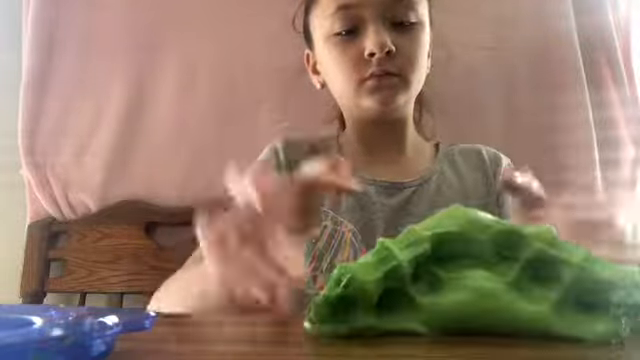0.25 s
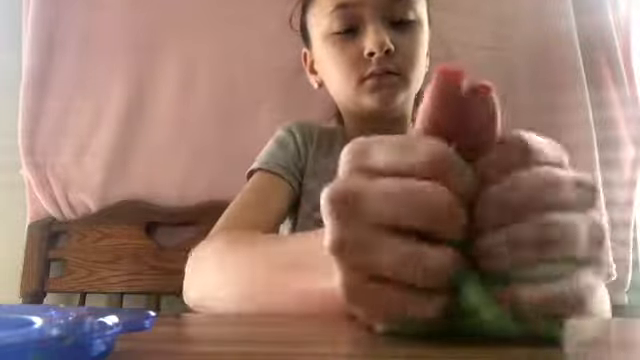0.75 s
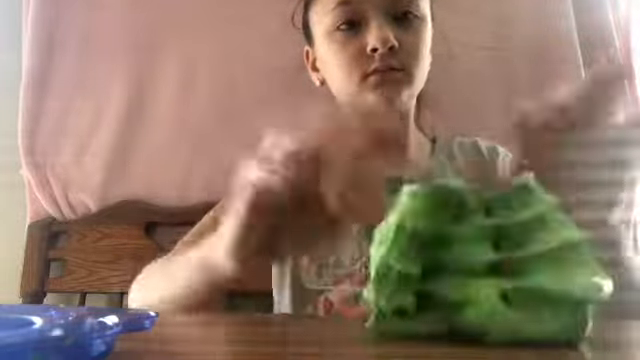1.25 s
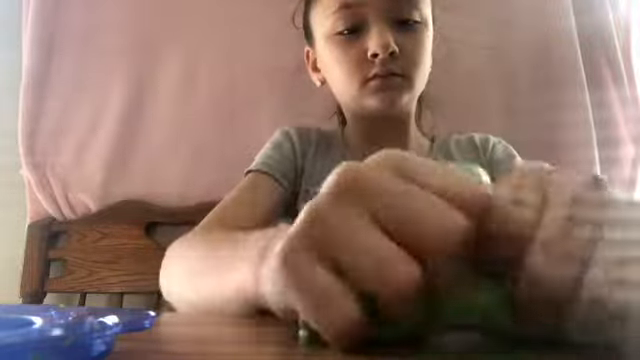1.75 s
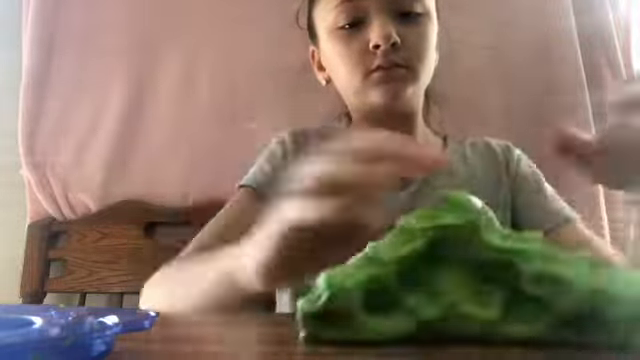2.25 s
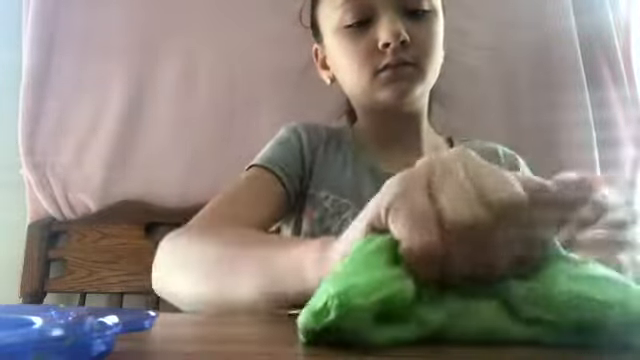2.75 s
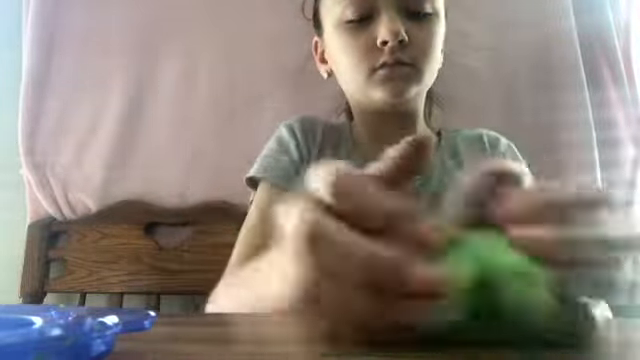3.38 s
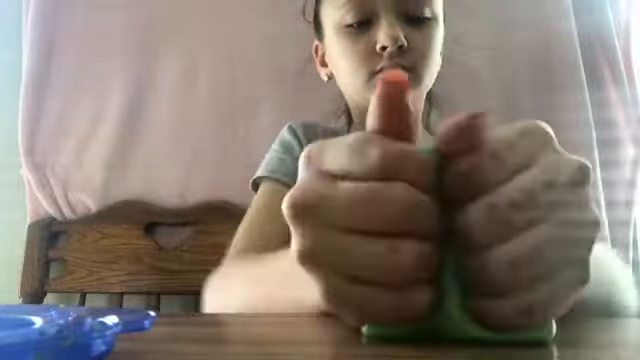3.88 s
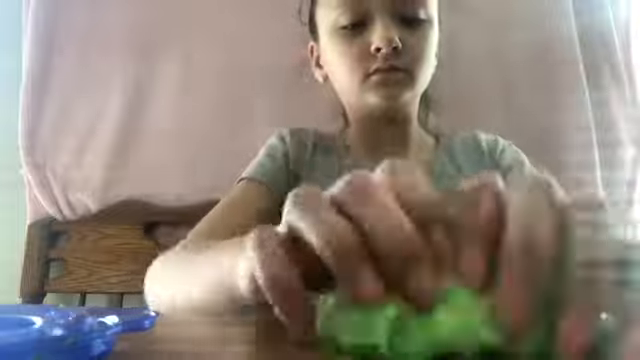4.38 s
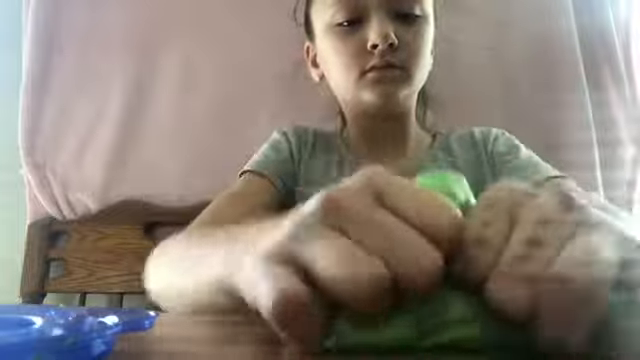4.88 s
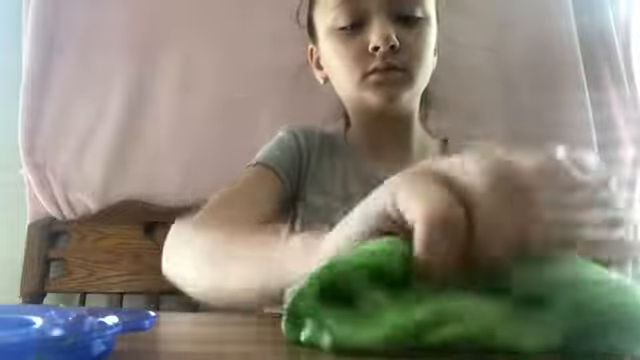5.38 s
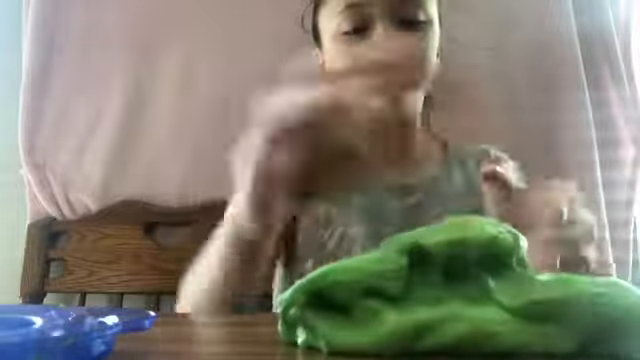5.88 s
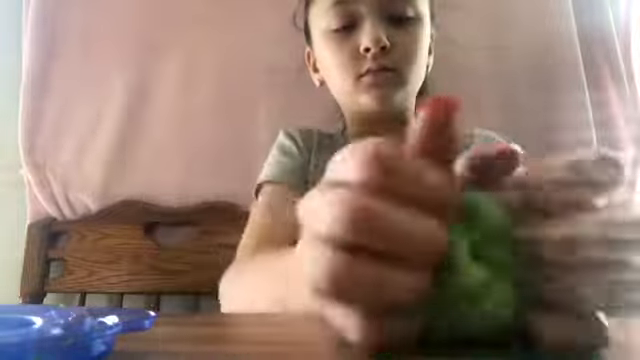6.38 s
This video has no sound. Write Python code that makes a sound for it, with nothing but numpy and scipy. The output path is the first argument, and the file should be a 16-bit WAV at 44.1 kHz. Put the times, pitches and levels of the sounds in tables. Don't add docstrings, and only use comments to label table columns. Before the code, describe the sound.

A small microphone sits close to hands kneading sticky slime on a wooden table in a quiet bedroom. A wet peel and small pops open the sound, then a softer moment. From 0.65 to 0.95 seconds a hollow plop and a spitting cluster burst out, strongest near 0.87. Fingers peel with a crackle at 1.1; knocks and scattered pops run from 1.45 to 2.25, ending in a round gulp. It thins until about 3.3, with faint ticks and a sticky peel near 3.0. Bright snaps crowd 3.45 to 3.75, peaking at 3.7. Dense popping and squelching fills 4.45 to 4.85, with a very loud crack at 4.79. Another peel comes at 5.0, a barely audible skin squeak at 5.3, and a big hollow pop at 5.63. Thumps and peels lead to a final sharp cluster at 6.5 to 6.6. Low hum continues throughout; a faint whine fades around 2.

```python
import sys
import numpy as np
from scipy import signal
from scipy.fft import rfft, irfft, next_fast_len
from scipy.io import wavfile
from scipy.ndimage import uniform_filter1d, map_coordinates

SR = 44100
rng = np.random.default_rng(int(sys.argv[2]) if len(sys.argv) > 2 else 0)


def nominal_scale(level):
    x = np.asarray(level, float) / 20
    return 10 ** x


def file_out(sig):
    cols = np.atleast_2d(sig).T
    lim = np.clip(cols, -1, 1)
    pcm = np.round(lim * 32767).astype(np.int16)
    wavfile.write(sys.argv[1], SR, pcm)


N = 292383


def unit(x):
    return x / np.sqrt(np.mean(x ** 2) + 1e-20)


def along(points, hz):
    f, v = np.transpose(points)
    return np.interp(np.log(hz + 1), np.log(f + 1), v)


def curves(rows):
    s, *cols = np.transpose(rows)
    return [np.interp(np.arange(N) / SR, s, c) for c in cols]


def wobble(rate):
    knots = rng.standard_normal(int(N * rate / SR) + 4)
    return map_coordinates(knots, [np.arange(N) * rate / SR])


def filtered(x, response):
    m = next_fast_len(N + SR // 2)
    return irfft(rfft(x, m) * response(np.fft.rfftfreq(m, 1 / SR)), m)[..., :N]


def coloured(x, spectrum):
    return unit(filtered(x, lambda hz: nominal_scale(along(spectrum, hz))))


def decay(t, t60):
    return nominal_scale(-60 * t / t60)


def ring(t, hz, t60, rise):
    return np.sin(2 * np.pi * hz * t) * decay(t, t60) * (1 - np.exp(-t / rise))


def burst(x, db):
    return nominal_scale(db) * x * np.sqrt(SR / 1000 / np.sum(x ** 2))


def place(out, s, sound):
    out[round(s * SR):][:len(sound)] += sound


# (time [s], snap level [dB], snap pitch [Hz], hollow level [dB], hollow pitch [Hz])
DEEP_POCKETS = [(0.0706, -27.5, 4080, -35, 2320), (1.1965, -24.5, 5200, -31, 2300),
                (1.5732, -35, 3630, -29, 1200), (1.8264, -34, 5840, -32, 1650),
                (1.9004, -24, 4420, -33, 2480), (1.917, -49, 4149, -35.5, 1740),
                (2.0893, -30, 2800, -39.5, 1348), (2.2064, -25.5, 4940, -36.5, 1100),
                (2.2285, -24.5, 4100, -26.5, 1530), (3.351, -39.5, 6900, -32.5, 1490),
                (3.466, -29, 4680, -25, 1390), (3.5351, -28.5, 3120, -29, 1760),
                (4.0942, -34, 6200, -29.5, 1110), (4.458, -28.5, 6000, -24, 1470),
                (4.472, -27, 8200, -35, 1090), (4.653, -22, 6700, -33, 2600),
                (4.7337, -31.5, 7100, -33, 1330), (4.773, -32.5, 3500, -32, 800),
                (4.7854, -10, 6560, -21, 1690), (4.822, -28, 2550, -27.5, 1200),
                (4.8539, -25.5, 4600, -39.5, 1700), (5.6285, -16, 6100, -14.5, 1660),
                (6.2099, -34.5, 7560, -31.5, 1538), (6.502, -35.5, 4940, -35, 1970)]
# (time [s], snap level [dB], snap pitch [Hz], air level [dB])
THIN_POCKETS = [(.758, -33.5, 3742, -37.5), (0.8108, -36.5, 3980, -38), (0.839, -40, 7150, -46),
                (0.8729, -17.5, 4900, -17), (0.886, -35, 4650, -19.5), (0.889, -53, 7730, -34),
                (0.9218, -30.5, 2960, -44), (.925, -30, 6300, -40.5), (0.935, -24, 6650, -43),
                (1.1556, -34.5, 3600, -36), (1.6521, -32, 4500, -51), (1.72, -29, 4830, -31.5),
                (1.7686, -39, 6629, -32), (1.8783, -38, 6860, -36), (3.4505, -28, 3600, -40),
                (3.457, -38.5, 2690, -47), (3.6145, -17, 6430, -18), (3.6433, -20.5, 6600, -25),
                (3.7008, -10, 6700, -38), (3.72, -15.5, 6400, -25.5), (3.8126, -45, 8100, -36),
                (4.465, -55, 7280, -24.5), (4.665, -39, 7840, -34.5), (4.6988, -22.5, 6400, -50.5),
                (6.4403, -39, 4900, -34.5), (6.5242, -16, 3800, -15.5), (6.5324, -25.5, 6000, -24),
                (6.5782, -21.5, 5200, -40), (6.5833, -13, 4860, -26.5), (6.6172, -20.5, 6000, -45)]
# (time [s], snap level [dB], snap pitch [Hz])
SMALL_POCKETS = [(0.038, -30, 2760), (.56, -33, 6030), (0.578, -37, 6460), (0.7461, -37, 7156),
                 (1.459, -42.5, 8200), (1.6267, -39, 5100), (1.707, -37, 6208), (1.8104, -38.5, 5150),
                 (1.9113, -33.5, 9000), (2.6408, -46.5, 6660), (2.8063, -46, 6600), (3.3596, -38.5, 2640),
                 (3.4226, -33, 7140), (3.8193, -38.5, 7320), (3.8528, -32.5, 6007), (4.0065, -34, 4380),
                 (4.0177, -31, 7560), (4.0911, -33, 3900), (4.444, -35, 8000), (4.538, -32.5, 3600),
                 (4.5786, -35.5, 2630), (4.617, -33, 2520), (4.703, -29, 2370), (4.9343, -36, 4780),
                 (5.595, -37.5, 2580), (5.638, -38, 5490), (5.854, -30.5, 5000), (6.1052, -40, 6470),
                 (6.3417, -38.5, 6300), (6.449, -33.5, 6300)]
# (time [s], hollow level [dB], hollow pitch [Hz])
FINGER_PLOPS = [(0.057, -27, 2060), (0.6625, -27.5, 1107), (1.18, -25.5, 1400), (1.1844, -30, 646.5),
                (1.457, -43, 855), (1.685, -38, 1623), (1.8098, -36, 1740), (1.8148, -35.5, 2320),
                (2.098, -30, 1030), (2.115, -29.5, 1320), (2.8218, -33.5, 1500), (3.5829, -34, 1780),
                (3.6145, -28, 1730), (3.6225, -33.5, 1070), (4.0837, -32.5, 1860), (4.13, -42, 1680),
                (4.3508, -42, 807), (4.5278, -34.5, 1780), (4.783, -20, 1550), (5.5734, -36, 1660),
                (6.2024, -34.5, 1590), (6.524, -21, 1870)]


def pockets():
    shallow_db, shallow_hz = -25.5, 1500
    deep = [(s, db, hz, db - 17, low_db, low_hz) for s, db, hz, low_db, low_hz in DEEP_POCKETS]
    thin = [(s, db, hz, air_db, db + shallow_db, shallow_hz) for s, db, hz, air_db in THIN_POCKETS]
    small = [(s, db, hz, db - 17.5, db + shallow_db, shallow_hz) for s, db, hz in SMALL_POCKETS]
    plops = [(s, db - 22, 4500, db - 25, db, hz) for s, db, hz in FINGER_PLOPS]
    return deep + thin + small + plops


def pops():
    slap_s, slap_db, slap_hz = 0.0092, -29, 6000
    out, t = np.zeros(N + SR), np.arange(SR // 30) / SR
    hz = np.fft.rfftfreq(len(t), 1 / SR)
    late = np.maximum(t - slap_s, 0)
    for s, snap_db, snap_hz, air_db, hollow_db, hollow_hz in pockets():
        noise, luck = rng.standard_normal((2, len(t))), rng.random(3)
        snap = ring(t, snap_hz, 16 / snap_hz, .00006)
        snap = snap + 2.1 * ring(t, snap_hz * (.92 + .2 * luck[0]), 4.2 / snap_hz, .00003)
        air = ring(t, 9000 + 2500 * luck[1], 0.001, .00004)
        air = air - ring(t, 12200 + 3000 * luck[2], 0.0008, .00004)
        hollow = ring(t, hollow_hz, 7 / hollow_hz, .0001)
        flap = irfft(rfft(noise[0]) * hz / (1 + (hz / (1.1 * snap_hz)) ** 4), len(t))
        spray = flap * decay(t, 0.006) * (1 - np.exp(-t / 0.0011))
        slap = irfft(rfft(noise[1]) / (1 + ((hz - slap_hz) / 2000) ** 4), len(t))
        slap = slap * late * decay(late, .008)
        pop = burst(snap, snap_db) + burst(air, air_db)
        pop = pop + burst(hollow, hollow_db) + burst(spray, snap_db - 11)
        pop = .95 * (pop + .28 * np.roll(pop, rng.integers(7, 19)))
        place(out, s, pop + burst(slap, snap_db + slap_db))
    return filtered(out[:N], lambda hz: (1j * hz / (480 + 1j * hz)) ** 2)


# (time [s], level over 1 ms [dB], pitch [Hz])
BUBBLE_TICKS = [(0.4503, -45.5, 5700), (0.646, -43.5, 2600), (0.716, -34.5, 970), (0.7204, -40.5, 614),
                (0.9447, -41, 1530), (1.4776, -46, 10540), (1.5593, -60, 2300), (1.7854, -40, 10620),
                (1.8802, -45, 1756), (6.034, -54, 7000), (2.7428, -44, 1360), (3.693, -48.5, 4600),
                (2.918, -49, 7900), (3.256, -49, 1609), (4.7832, -29, 6000), (3.391, -42.5, 4400),
                (3.5055, -36, 8000.0), (3.7562, -38.5, 13670), (4.6883, -37.5, 4580), (2.605, -52, 6000),
                (4.742, -38.5, 6140), (6.1896, -48, 2416), (6.3206, -43.5, 12700.0), (6.455, -43.5, 7500),
                (1.5724, -33.5, 10700), (1.171, -38.5, 8000), (3.401, -42.5, 3230), (4.013, -34, 7100),
                (4.372, -44, 7800), (.013, -35.5, 6000), (.025, -38, 3500), (0.458, -48.5, 6000),
                (1.641, -43, 13000), (1.174, -48, 4500), (1.1796, -39.5, 6500), (1.1955, -32.5, 4600),
                (1.1985, -33.5, 6000), (1.205, -32.5, 12500), (1.209, -44, 7000), (1.232, -47, 13000),
                (3.7203, -16.5, 14200), (4.022, -39.5, 4500), (4.1197, -42.5, 8000), (4.553, -46, 5000),
                (4.561, -46.5, 7000), (4.594, -47.5, 6000), (6.5836, -18.5, 7900), (6.5758, -43, 5000),
                (1.767, -37, 10000), (1.797, -43, 7000), (5.629, -24.5, 2670), (.873, -33.5, 2990),
                (1.818, -44, 6000)]
# (time [s], level over 1 ms [dB], pitch [Hz])
AIR_SQUIRTS = [
    (.996, -51.5, 8100),
    (3.72, -16, 14470),
    (4.048, -43, 12430),
    (4.056, -42, 14500),
    (4.08, -38, 13700),
    (4.7848, -22.5, 9180),
    (5.6291, -22.5, 9980),
    (3.6145, -23.5, 9870),
    (6.4402, -21.5, 14900),
]
# (time [s], level [dB], pitch [Hz], t60 [s])
WHISTLING_HOLE = (.6625, -42, 1900, .2)


def bubbles():
    out, t = np.zeros(N + SR), np.arange(SR // 200) / SR
    for s, db, hz in BUBBLE_TICKS:
        place(out, s, burst(ring(t, hz, 4 / hz, .00005), db))
    for s, db, hz in AIR_SQUIRTS:
        place(out, s, burst(ring(t, hz, 16 / hz, .0001), db))
    s, db, hole_hz, t60 = WHISTLING_HOLE
    since = np.arange(N) / SR - s

    def band(centre, width):
        noise = rng.standard_normal(N)
        return unit(filtered(noise, lambda hz: 1 / (1 + ((hz - centre) / width) ** 2)))

    opened = np.clip(since / .06, 0, 1)
    whistle = (1 - opened) * band(.94 * hole_hz, 90) + opened * band(1.04 * hole_hz, 260)
    whistle = unit(whistle * nominal_scale(2 * wobble(120)))
    return out[:N] + (since > 0) * nominal_scale(db) * decay(np.abs(since), t60) * whistle


# (time [s], level over 1 ms [dB], pitch [Hz])
SNAPPING_THREADS = [(0.0567, -42, 4564), (0.5223, -50, 5560), (0.5693, -40, 7240), (0.6799, -47.5, 11130),
                    (0.8261, -47, 5340), (0.8558, -42.5, 5000), (1.0458, -48.5, 6900), (1.0875, -39, 4800),
                    (1.1149, -36, 6786), (1.161, -34, 12190), (1.1707, -38, 7329), (1.1847, -33.5, 5300),
                    (1.5372, -55, 7605), (1.559, -49, 3010), (1.6462, -42, 6290), (1.7452, -46, 4310),
                    (1.7613, -41, 4910), (1.7821, -48, 4090), (1.8395, -48.5, 4950), (1.8827, -43, 3010),
                    (1.916, -40.5, 3900), (.939, -44, 3500), (2.045, -37, 6600), (2.0964, -37, 9126),
                    (2.0994, -38, 4050), (2.1157, -38, 4390), (3.657, -46, 13500), (2.7417, -56.5, 3140),
                    (2.9094, -53, 7190), (2.92, -47, 7026), (3.0003, -46, 6200), (3.019, -52, 7600),
                    (3.0649, -40, 4950), (3.0717, -40, 3920), (3.2561, -54, 5940), (3.266, -46.5, 5970),
                    (3.4557, -37.5, 3036), (3.517, -44.5, 6073), (3.5915, -46, 3010), (3.7305, -40.5, 6030),
                    (3.7484, -43, 12920), (5.601, -54, 12000), (4.0963, -35.5, 6250), (4.1293, -41.5, 5060),
                    (4.351, -45, 13730), (4.4411, -46, 6370), (4.5272, -36.5, 6100), (4.7013, -37.5, 3080),
                    (4.7738, -31.5, 13220), (4.7964, -36, 6200), (5.0347, -37, 3000), (5.5825, -52, 6590),
                    (5.592, -47, 6890), (5.8551, -37.5, 5160), (5.8634, -35.5, 3600), (6.1883, -54, 5380),
                    (6.2027, -39.5, 7450), (6.344, -45, 5828), (6.4295, -47.5, 14560), (6.5662, -44, 4350)]
# (time [s], level over 1 ms [dB], pitch [Hz])
THICK_STRANDS = [(0.0152, -41, 1340), (0.0352, -34.5, 1980), (0.7456, -50.5, 1300), (0.789, -43.5, 1250),
                 (0.839, -45, 2150), (0.6624, -27, 1760), (0.925, -39, 2970), (0.9344, -33, 2970),
                 (1.6267, -45, 2970), (1.7137, -41, 1590), (1.7186, -42.5, 2580), (1.763, -46.5, 730),
                 (1.8566, -48, 1340), (1.8782, -44, 1420), (2.2311, -34.5, 1340), (3.4503, -31.5, 2970),
                 (3.664, -42.5, 1160), (3.7484, -42, 1030), (3.9761, -51, 1640), (4.08, -36, 1590),
                 (4.0904, -33, 2760), (4.134, -47, 1250), (4.6647, -42, 1420), (4.6816, -39.5, 1720),
                 (4.6947, -42, 2450), (4.761, -44, 1550), (4.7961, -40.5, 1210), (4.8535, -30, 1590),
                 (5.0223, -34.5, 1420), (5.0335, -43.5, 1340), (5.0536, -31.5, 780), (5.612, -49, 900),
                 (5.8508, -39, 2970), (5.8743, -43, 1250), (6.106, -43, 1720), (6.342, -45, 990),
                 (6.4488, -49, 1510), (6.455, -46, 2840)]
# (time [s], level over 1 ms [dB], pitch [Hz])
SLUMP_GULPS = [(2.21, -36, 826), (2.219, -32.5, 770), (2.2289, -21.5, 517), (2.824, -36.5, 575),
               (3.535, -32, 540), (3.622, -38, 466), (3.7015, -38.5, 560), (4.459, -33.5, 560),
               (4.472, -25.5, 520), (4.49, -27.5, 420), (6.21, -32.5, 316), (4.477, -31.5, 594),
               (1.196, -32.5, 385), (6.583, -34, 430)]


def threads():
    out, t = np.zeros(N + SR), np.arange(SR // 100) / SR
    for s, db, hz in SNAPPING_THREADS:
        fray = np.diff(rng.standard_normal(len(t)), prepend=0)
        fray = fray * decay(t, .004) * (1 - np.exp(-t / .0003))
        place(out, s, burst(ring(t, hz, 6 / hz, 0.00018), db) + burst(fray, db - 0.5))
    for s, db, hz in THICK_STRANDS:
        place(out, s, burst(ring(t, hz, 6 / hz, 0.00031), db + 1.0))
    slow = np.arange(SR // 25) / SR
    for s, db, hz in SLUMP_GULPS:
        place(out, s, burst(ring(slow, hz, 6.2 / hz, .0015), db))
    return out[:N]


def strokes(rows, rise, swell_db, fall):
    t, power = np.arange(0, N / SR + .002, .001), 0
    for s, length, crackle_db, squelch_db in rows:
        before, after = np.maximum(s - t, 0), np.maximum(t - s - length, 0)
        shape_db = swell_db * np.clip((t - s) / length, 0, 1) - rise * before - fall * after
        power = power + nominal_scale(2 * (shape_db + np.array([[crackle_db], [squelch_db]])))
    return np.array([np.interp(np.arange(N) / SR, t, p) for p in power])


# (time [s], length [s], crackle level [dB], squelch level [dB])
FINGER_PULLS = [(0, 0.09, -44.5, -47), (.415, 0.14, -65, -65), (.57, 0.022, -54, -55.5),
                (1.1, 0.11, -47, -50), (2.045, 0.11, -46.5, -49.5), (2.98, 0.089, -53.5, -52.5),
                (3.25, 0.041, -65.5, -68), (3.345, 0.02, -59, -57), (3.43, 0.023, -52.5, -56),
                (4.035, 0.06, -48.5, -49.5), (4.4, 0.078, -65, -68), (4.97, 0.12, -49, -51),
                (5.4, 0.017, -66.5, -62), (5.815, 0.058, -49, -48.5), (6.075, 0.0362, -66, -65.5),
                (6.29, 0.11, -59, -64), (1.215, 0.016, -61, -63), (4.118, 0.021, -61, -57),
                (4.005, .03, -56, -56), (5.05, 0.032, -50, -62), (1.74, .025, -60, -56)]
# (time [s], length [s], crackle level [dB], squelch level [dB])
AIR_SEEPS = [(.668, 0.74, -61.5, -60), (.881, 0.026, -38.5, -50), (.926, 0.12, -58, -74.5),
             (1.46, 0.46, -65, -65), (1.577, 0.132, -46, -49), (1.714, 0.22, -55.5, -52),
             (1.9, 0.43, -64.5, -79), (2.2052, 0.021, -40, -52), (2.228, 0.17, -80, -63.5),
             (2.47, 0.69, -70.5, -64.5), (3.46, 0.24, -55.5, -60), (3.623, 0.14, -56.5, -59),
             (3.709, 0.23, -53.5, -63), (4.1, 0.026, -50, -48), (4.462, 0.09, -48.5, -43.5),
             (4.58, 0.58, -60, -60), (4.783, 0.12, -48.5, -65), (5.45, 0.73, -74, -64.5),
             (5.637, 0.03, -46.5, -49), (6.11, 0.098, -61, -59.5), (6.21, 0.038, -49.5, -67),
             (6.41, 0.17, -55.5, -57.5), (6.532, 0.051, -51, -66), (6.581, 0.046, -47.5, -52),
             (.1, 0.1, -66.5, -64.5), (1.235, 0.11, -77.5, -69), (4.145, 0.12, -76, -68),
             (5.67, 0.073, -56.5, -55), (5.885, 0.097, -72, -76.5), (4.5, 0.16, -51, -67)]


def tearing():
    pulls = strokes(FINGER_PULLS, rise=404, swell_db=4, fall=1300)
    seeps = strokes(AIR_SEEPS, rise=6000, swell_db=-16.5, fall=350)
    return 10 * np.log10(pulls + seeps + 1e-12)


def grains(density, hz, spread_db):
    count = int(density * N / SR)
    when, size = rng.random(count), rng.exponential(size=count)
    pitch = rng.standard_normal(count)
    step = np.arange(64)
    tone = np.clip(hz * np.exp(.6 * pitch), 300, SR / 3)[:, None]
    loudness = nominal_scale(spread_db * np.minimum(size, 3))[:, None]
    shape = loudness * ring(step / SR, tone, 8 / tone, .0001)
    at = (when * N).astype(int)[:, None] + step
    return unit(np.bincount(at.ravel(), shape.ravel(), N + len(step))[:N])


def patchy(depth_db):
    z = signal.stft(rng.standard_normal(N), nperseg=128)[2]
    field = uniform_filter1d(rng.standard_normal(z.shape), size=5, axis=0)
    field = uniform_filter1d(field, size=6, axis=1)
    return unit(signal.istft(z * nominal_scale(depth_db * unit(field)), nperseg=128)[1][:N])


# (frequency [Hz], level [dB])
FILM_COLOUR = [(880, -36.5), (1500, 3.5), (1910, -9), (3020, -7), (3490, -5.5), (7700, 0), (8520, -4.5),
               (12800, -4.5), (15400, -6), (17000, -26)]
# (frequency [Hz], level [dB])
SQUELCH_COLOUR = [(70, -28), (300, -8), (968, -5.5), (1230, -4), (1450, -1.5), (1910, -4), (3500, -4.5),
                  (4550, -30.5), (7700, -120)]


def peel():
    crackle_db, squelch_db = tearing()
    film = grains(4000, 9000, 3.5) + .5 * grains(900, 6500, 2.5) + .75 * patchy(4)
    strands = .65 * grains(1500, 1200, 2.5) + .7 * patchy(3.5)
    crackle = nominal_scale(crackle_db) * coloured(film, FILM_COLOUR)
    squelch = nominal_scale(squelch_db + 1.6 * wobble(90)) * coloured(strands, SQUELCH_COLOUR)
    clumps = nominal_scale(2.3 * wobble(200) + 1.1 * wobble(45))
    return filtered(clumps * (crackle + squelch), lambda hz: hz < 15900)


# (time [s], knock level [dB], knock pitch [Hz], boom level [dB], knock t60 [s])
TABLE_THUMPS = [(0.01, -41.5, 594, -50, 0.42), (0.304, -42.5, 261, -57.5, 0.38),
                (0.321, -39.5, 193, -50, 0.25), (1.105, -41, 193.4, -62.5, 0.3),
                (1.457, -40, 222.4, -84, 0.19), (1.571, -32, 231, -51.5, 0.13),
                (1.588, -41, 390, -56, 0.26), (2.07, -40, 220, -54.5, 0.47), (2.206, -37, 670, -77, 0.32),
                (2.234, -33.5, 624, -76, 0.071), (2.493, -51, 149.6, -53.5, 0.13),
                (2.826, -43.5, 595.9, -87, 0.066), (3.246, -38.5, 321, -55.5, 0.17),
                (3.519, -40.5, 624, -49, 0.11), (4.349, -36, 390, -62, 0.13),
                (4.361, -37, 230.4, -62.5, 0.15), (4.467, -34, 170, -56.5, 0.15),
                (4.494, -31, 379, -65, 0.15), (5.386, -38, 207.3, -41, 0.16),
                (5.815, -40.5, 231, -65, 0.35), (6.103, -36, 252, -66, 0.1122),
                (6.187, -33, 520, -57, 0.21), (6.212, -34.5, 170, -60, 0.28), (6.378, -48, 247, -52, 0.1)]


def thumps():
    drop_hz, drop_s = 91, 0.008
    out, t = np.zeros(N + SR), np.arange(SR // 4) / SR
    hz = np.fft.rfftfreq(len(t), 1 / SR)
    for s, knock_db, knock_hz, boom_db, t60 in TABLE_THUMPS:
        fade = decay(t, np.clip(t60, .02, .3)) * (1 - np.exp(-t / 0.00047))
        wood = (hz * knock_hz / (knock_hz ** 2 - hz ** 2 + 1j * hz * knock_hz * .75)) ** 2
        knock = unit(irfft(rfft(rng.standard_normal(len(t))) * wood, len(t))) * fade
        cycles = (42 + 25 * rng.random()) * t + drop_hz * drop_s * (1 - np.exp(-t / drop_s))
        boom = np.sin(2 * np.pi * cycles) * decay(t, 0.13) * (1 - np.exp(-t / 0.0021))
        place(out, s, nominal_scale(knock_db - 8) * knock + nominal_scale(boom_db + 8) * boom)
    return out[:N]


# (time [s], length [s], level [dB], pitch [Hz])
SKIN_SQUEAK = (5.32, .08, -69, 2330)


def squeak():
    s, length, db, hz = SKIN_SQUEAK
    t = np.arange(N) / SR
    swell = np.sin(np.pi * np.clip((t - s) / length, 0, 1)) ** .5
    return nominal_scale(db) * swell * np.sin(2 * np.pi * hz * t + wobble(60))


# (frequency [Hz], t60 [s])
ROOM_DECAY = [(300, 0.7), (2000, 0.32), (6000, 0.16), (10000, 0.2)]


def walls(x):
    hz, t, z = signal.stft(rng.standard_normal(SR // 3), SR, nperseg=256)
    fading = z * decay(t, along(ROOM_DECAY, hz)[:, None])
    tail = signal.istft(fading, SR, nperseg=256)[1]
    delayed = np.pad(x, (400, 0))
    return signal.fftconvolve(delayed, tail / np.linalg.norm(tail))[:N]


# (frequency [Hz], level [dB])
HUM_COLOUR = [(20, -14), (60, -5.5), (170, -6.5), (400, -5.5), (650, -10.5), (1050, -19), (2000, -27.5),
              (3200, -32), (6500, -37), (9500, -41), (15000, -42.5), (16500, -61.5)]
# (pitch [Hz], level [dB])
APPLIANCE_TONES = [
    (233, -70),
    (390, -68),
]
# (time [s], level [dB])
WHINE_LEVEL = [
    (0, -69),
    (2.0, -68),
    (2.2, -80.5),
]


def background():
    t = np.arange(N) / SR
    mix = nominal_scale(-58 + 0.21 * wobble(1.9)) * coloured(rng.standard_normal(N), HUM_COLOUR)
    for hz, db in APPLIANCE_TONES:
        tone = np.sin(2 * np.pi * hz * t + 2.97 * wobble(4.8))
        mix = mix + nominal_scale(db + 3.3 * wobble(7.7)) * tone
    whine_db = curves(WHINE_LEVEL)[0] + 1.2 * wobble(3.1)
    return mix + nominal_scale(whine_db) * np.sin(2 * np.pi * 1001 * t)


def scene():
    slime = pops() + bubbles() + threads() + peel()
    echo = nominal_scale(-26.5) * walls(slime)
    return (slime + echo + thumps() + squeak() + background())[None]


def roll_off(x):
    return signal.sosfilt(signal.butter(12, 17170, fs=SR, output="sos"), x)


# (frequency [Hz], level [dB])
MIX_RESPONSE = [(20, -9), (70, 0), (8050, 0), (8090, -6), (8250, 0), (15900, 0), (16500, -10), (17300, -40)]


def record(dry):
    def response(hz):
        lag = 1.5 * np.log((hz + 60) / (hz + 1500))
        return nominal_scale(along(MIX_RESPONSE, hz)) * np.exp(-2j * np.pi * lag)

    mix = filtered(dry, response)
    return roll_off(mix)


dry = scene()
out = record(dry)
file_out(out)
```